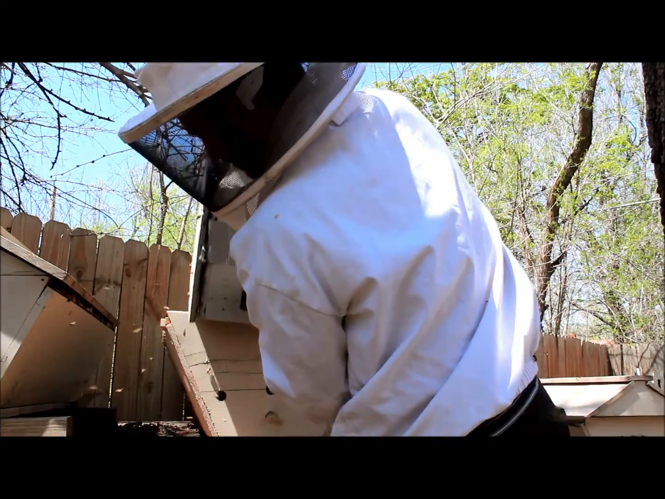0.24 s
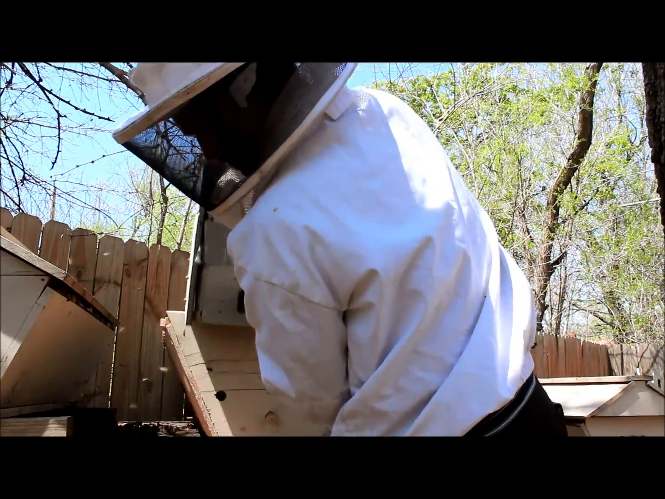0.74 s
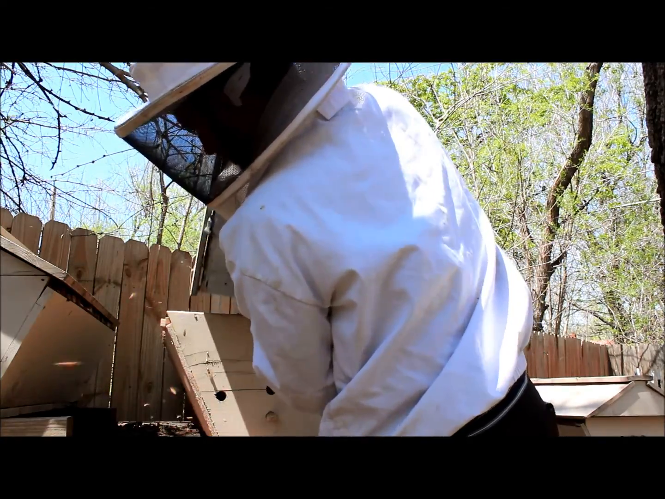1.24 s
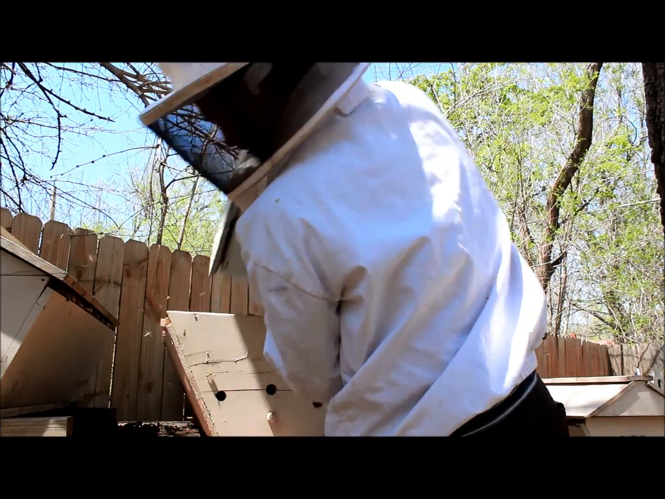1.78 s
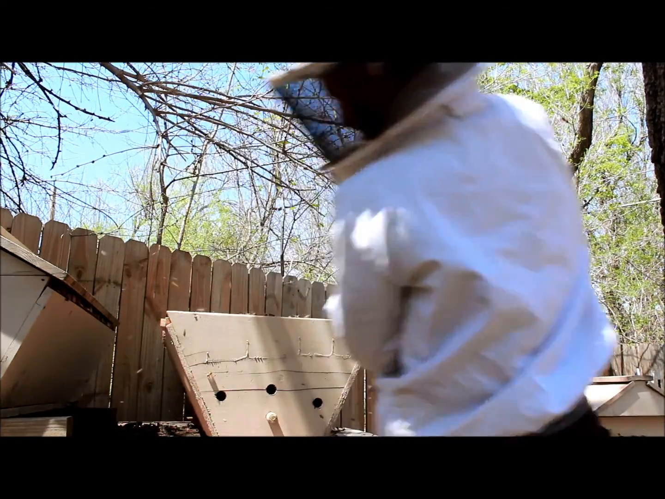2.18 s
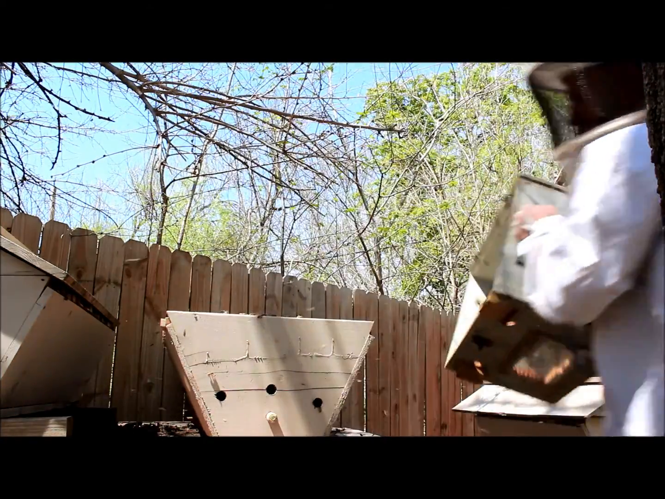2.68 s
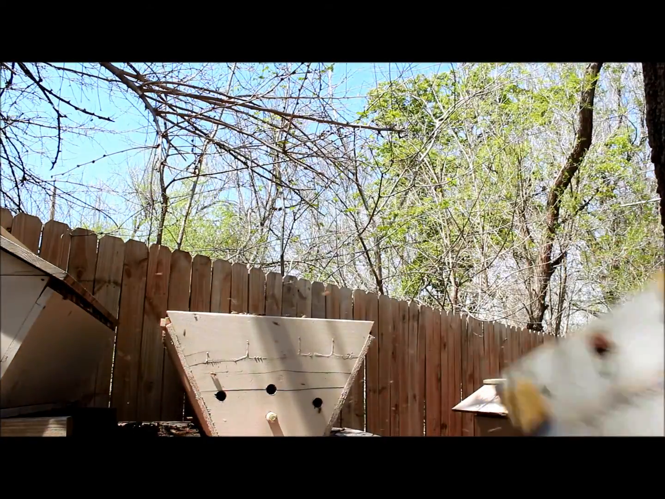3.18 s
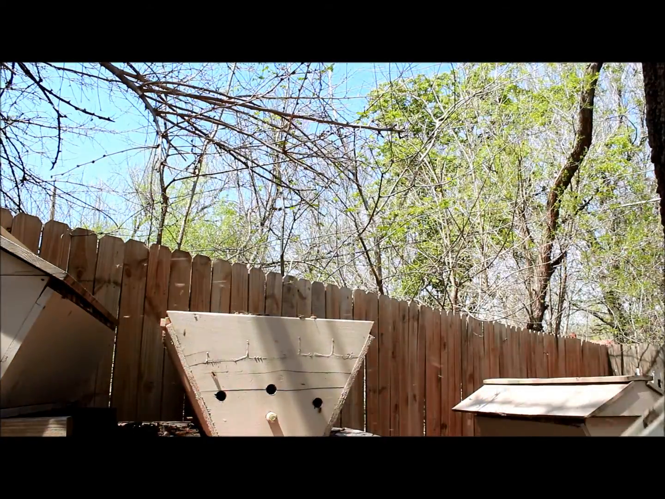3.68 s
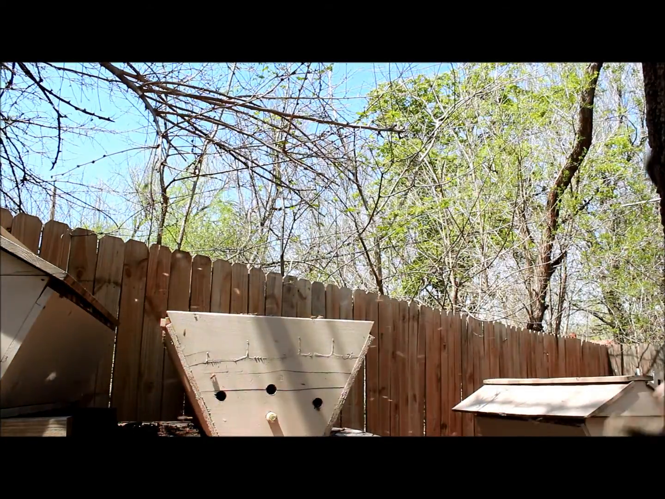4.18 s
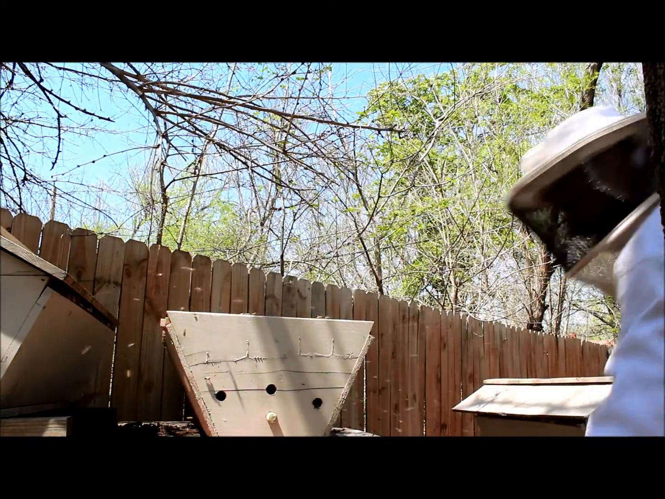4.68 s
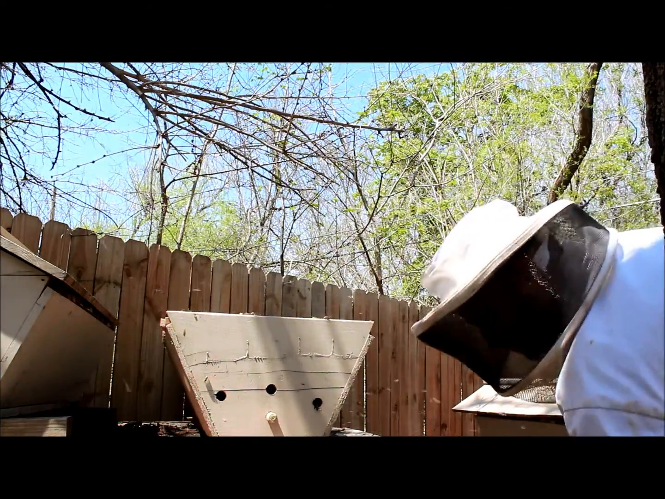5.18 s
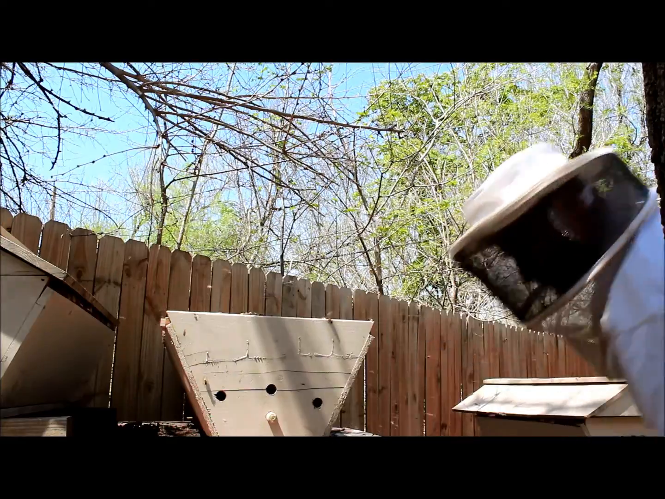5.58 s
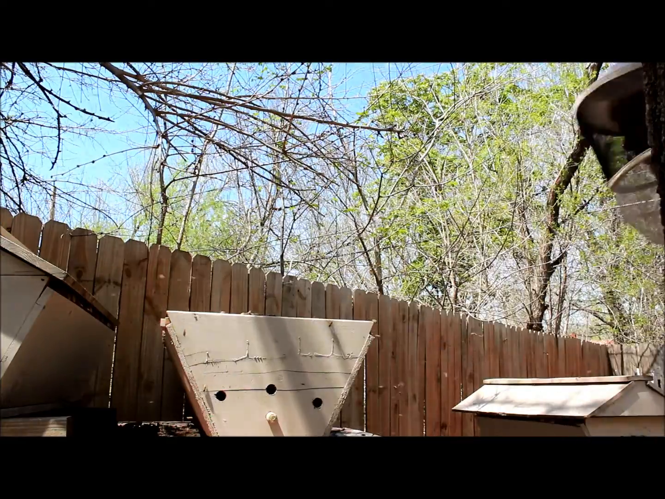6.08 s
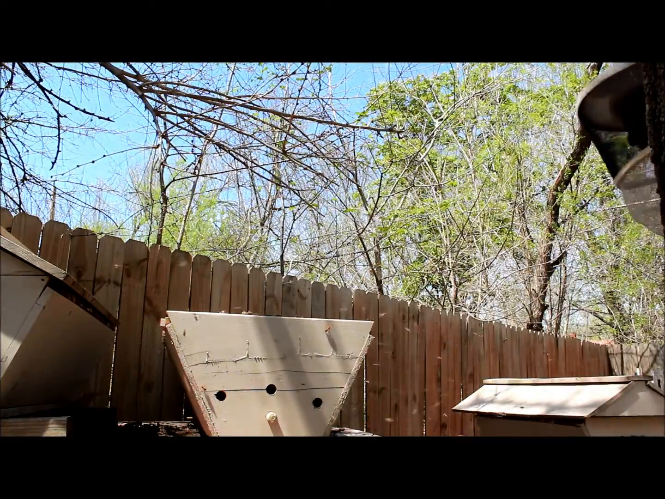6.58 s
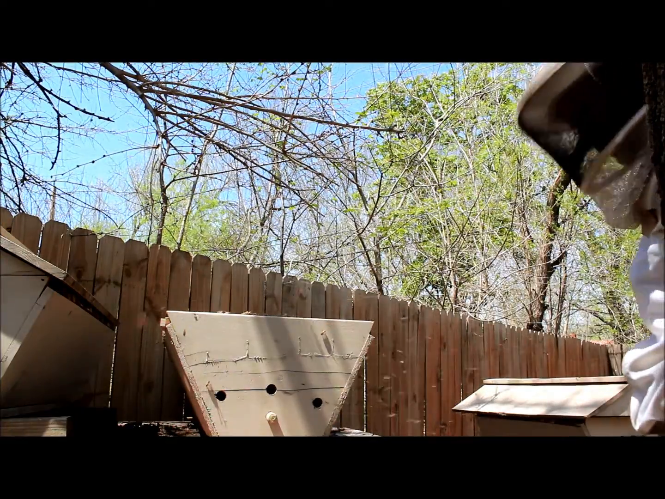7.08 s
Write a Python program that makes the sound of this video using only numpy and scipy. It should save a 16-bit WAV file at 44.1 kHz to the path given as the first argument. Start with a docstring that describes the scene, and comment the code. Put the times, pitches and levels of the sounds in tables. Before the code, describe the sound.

Outdoors beside beehives, a keeper handles a hollow wooden box close to the microphone. Heavy boomy thumps with rattling slats arrive in three early bursts, then only the low wavering buzz of many bees. Softer bumps, short scrapes and squeaks follow mid-way, then bright hard clacks late on. The loudest hits clip and briefly push down the bees; a short dry yard scatter follows each.

```python
"""A bee swarm drones, and at once a wooden box is knocked on a hive in a fenced yard.
A keeper turns the box over and sets it down: ringing modes make the thumps, coloured noise the
clacks and scrapes, wavering overtones the squeaks. Fence, hive and ground scatter them all.
The swarm is many wandering wing beats over noisy air; two low tones mix a far motor with box ring.
The loudest blows overload the microphone and its gain control ducks the swarm."""
import sys
import numpy as np
from scipy import signal
from scipy.io import wavfile
from scipy.ndimage import uniform_filter1d, minimum_filter1d, map_coordinates

SR = 44100
rng = np.random.default_rng(int(sys.argv[2]) if len(sys.argv) > 2 else 0)


def persist_wave(psi):
    """Save psi, clipped to +-1, as 16-bit WAV."""
    counts = np.round(np.clip(psi, -1, 1) * 32767).astype(np.int16)
    wavfile.write(sys.argv[1], SR, np.atleast_2d(counts).T)


N = 323694  # samples


def amp(db):
    """Turns dB into gain."""
    return 10 ** (np.asarray(db) / 20)


def evened(x):
    """Scales a sound to rms 1."""
    return x / np.sqrt(np.mean(x ** 2) + 1e-20)


def read(points, hz):
    """Reads a table over frequency, straight between points on a log axis."""
    f, value = np.transpose(points)
    return np.interp(np.log(hz + 1), np.log(f + 1), value)


def add(mix, start, sound):
    """Mixes a sound in at start seconds, cut at the end of the mix."""
    part = mix[round(start * SR):][:len(sound)]
    part += sound[:len(part)]


def drift(hz, count, length, rate):
    """Slow chance: count rows of random values, hz new ones a second, joined by straight lines."""
    knots = rng.standard_normal((count, 400))
    at = np.arange(length) / rate * hz
    return map_coordinates(knots, np.meshgrid(np.arange(count), at, indexing="ij"), order=1)


# Blows on the hollow box. Each row: start in seconds, peak level in dB, focus in Hz,
# fall away from the focus in dB per octave.
BLOWS = [(0.084, -4, 207, 6), (0.095, -13, 355, 12), (0.106, -8.5, 196, 7.5), (0.826, -0.5, 294, 3.5),
         (0.834, 2, 218, 5), (0.849, -16, 300, -5), (0.925, -20.5, 240, 3), (0.97, -21.5, 208, 8),
         (1.508, 6, 214, 4), (1.527, 2, 425, 8), (1.597, -15.5, 240, 2), (2.93, -25.5, 237, 9),
         (2.96, -28, 221, 7), (3.108, -15, 258, 17), (3.129, -19.5, 314, 16), (3.181, -25, 221, 25),
         (3.304, -16, 340, 38), (3.316, -8.5, 238, 32), (3.349, -23, 221, 0), (4.06, -24, 237, 18),
         (4.776, -32, 214, 8), (5.053, -9, 196, 9), (5.161, -10.5, 300, 15), (5.302, -18.5, 232, 5),
         (5.372, -17, 267, 28), (5.422, -21, 295, 12), (5.73, -20, 290, 21)]
# Modes of the box. Each row: frequency in Hz, relative level in dB,
# t60 in seconds before the force of the blow scales it.
BOX_MODES = [(135.4, -7.5, 0.14), (204.8, 1, 0.12), (238.5, 3.5, 0.044), (293, -5.5, 0.14), (345, -7, 0.12),
             (433.5, -5.5, 0.061), (483.6, -3.5, 0.086), (546, -17, 0.14), (593, -17, 0.11),
             (718, 0, 0.018), (858, -5, 0.048)]
# Ring time factor of a 0 dB blow; softer blows, the box held looser, ring longer.
BOX_RING, CHOKE_PER_DB = 0.7, 0.0737


def thump(db, focus_hz, narrow_db):
    """A blow sets the box modes ringing; its place favours those near the focus."""
    t = np.arange(SR // 4) / SR
    ring = BOX_RING - CHOKE_PER_DB * db
    hz, level_db, t60 = np.transpose(BOX_MODES)[:, :, None]
    sign = (-1) ** np.arange(len(BOX_MODES))[:, None]
    gain = sign * amp(level_db - narrow_db * abs(np.log2(hz / focus_hz)))
    decay = np.log(1000) / (t60 * ring)
    modes = gain * np.exp((2j * np.pi * hz - decay) * t)
    sound = modes.imag.sum(0) * np.minimum(t / 0.0012, 1)  # rises in 1.2 ms
    return amp(db) * sound / abs(sound).max()


# Dense modes of slats and mesh. Each row: frequency in Hz, relative level in dB per Hz.
SLAT_SPECTRUM = [(250, -53), (500, -1.5), (850, 2.9), (1300, -0.5), (1900, -2), (2250, -4.5), (2750, -7),
                 (3300, -9), (4100, -11), (6200, -24), (10000, -39.5), (16000, -48)]


def rattled(slips, tilt_db, rings=()):
    """Dense slat modes colour grainy noise; tilt_db gives the dB per octave at any moment."""
    hz, t, z = signal.stft(slips, SR, nperseg=256, noverlap=224)
    body_db = read(SLAT_SPECTRUM, hz)
    for ring_hz, lift_db in rings:
        octaves = np.log2(hz / ring_hz + 1e-9)
        body_db = body_db + lift_db * np.exp(-(octaves / 0.33) ** 2)
    octaves_up = np.log2(hz[:, None] / 1500 + 0.18)
    colour = amp(body_db[:, None] + octaves_up * tilt_db(t))
    z = z * colour / np.sqrt((colour ** 2).mean(0))  # the tilt leaves the level alone
    return evened(signal.istft(z, SR, nperseg=256, noverlap=224)[1][:len(slips)])


# Sharp taps that set slats and mesh rattling. Each row: start in seconds, peak level in dB,
# ring in Hz, starting tilt in dB per octave, t60 in seconds.
TAPS = [(0.077, -19, 2850, -8, 0.19), (0.085, -24, 2510, 10.5, 0.089), (0.106, -23, 766, 0.5, 0.14),
        (0.827, -16, 1670, 8.5, 0.077), (0.835, -0.5, 720, -3.5, 0.07), (0.849, -8.5, 1770, -12, 0.12),
        (0.935, -24, 3000, -5, 0.047), (1.508, -15, 783, 13, 0.031), (1.514, -7.5, 1060, -1.5, 0.14),
        (1.529, -8, 7100, 19.5, 0.015), (1.557, -21, 2400, -1.5, 0.11), (1.77, -37, 3500, 6, 0.025),
        (2.595, -28, 1880, 11.5, 0.063), (2.926, -23, 756, 1, 0.059), (3.065, -20, 829, 2.5, 0.056),
        (3.098, -13.5, 1020, 4.5, 0.079), (3.108, -12.5, 1520, 4, 0.047), (3.302, -18, 1730, -5.5, 0.1),
        (4.16, -14, 2740, 2, 0.04), (5.031, -27, 2500, -2, 0.045), (5.067, -14, 1500, 6, 0.043),
        (5.086, -7.5, 2000, 2.5, 0.057), (5.096, -5, 1340, 1.5, 0.035), (5.162, 8, 1040, 0, 0.027),
        (5.171, -3, 1950, 3, 0.048), (5.298, -5.5, 790, -7.5, 0.028), (5.458, -19, 790, 2.5, 0.05),
        (5.674, -30, 6500, 8, 0.035), (5.721, -8.5, 2830, -3.5, 0.056), (5.722, 2.7, 895, -10.5, 0.036)]
RING_LIFT_DB, CLACK_RISE_S = 10, 0.0014
CREST_DB = 8  # a rattle's peaks stand this far over its mean level


def clack(db, ring_hz, tilt_db, t60):
    """A rattle that starts sharply, dies fast and grows duller as it dies."""
    t = np.arange(SR // 10) / SR
    noise = rng.standard_normal(len(t))
    burst = rattled(noise, lambda at: tilt_db - 30 * at, [(ring_hz, RING_LIFT_DB)])
    return amp(db - CREST_DB - 60 * t / t60) * burst * np.minimum(t / CLACK_RISE_S, 1)


# Wood sliding on wood. Each row: time of greatest pressure in seconds, level in dB,
# tilt in dB per octave, build-up in seconds, release in seconds.
SLIDES = [(2.926, -38, 2.5, 0.035, 0.15), (3.118, -29, 2, 0.03, 0.072), (4.066, -33, 2, 0.008, 0.027),
          (4.105, -41, 1, 0.02, 0.011), (4.166, -31.5, 4, 0.093, 0.062), (4.233, -36.5, 0.5, 0.06, 0.066),
          (5.033, -31.5, 12, 0.003, 0.13), (5.099, -22, -1, 0.11, 0.073), (5.385, -32.5, -1.5, 0.03, 0.076),
          (5.425, -29, -7.5, 0.076, 0.053)]
STROKE_DB = 27  # how far the level lies under its top at either end of a stroke


def scrape(peak_s, db, tilt_db, build, release):
    """Dense uneven slips of the wood grain shake the slats; pressure builds, then lets go."""
    t = np.arange(-build, release, 1 / SR)
    slips = rng.standard_normal(SR // 4) * amp(4.5 * rng.standard_normal(SR // 4))
    sound = rattled(slips, lambda at: np.full_like(at, tilt_db))[:len(t)]
    t = t[:len(sound)]
    stroke_db = -STROKE_DB * np.where(t < 0, -t / build, t / release)
    return peak_s - build, sound * amp(db + stroke_db) * signal.windows.tukey(len(t), .15)


# Stick-slip squeaks. Each row: start in seconds, length in seconds, pitch in Hz, starting level
# in dB, loudest frequency in Hz, fall away from it in dB per octave, roughness as a pitch factor.
STICK_SLIPS = [(3.032, 0.027, 3170, -28.5, 3150, 20, 0.084), (3.107, 0.011, 3080, -27.5, 3150, 28, 0.25),
               (4.059, 0.062, 685, -31, 2040, 8, 0.28), (4.065, .012, 4080, -43, 4080, 28, .15),
               (4.126, 0.041, 1207, -25, 3000, 4.5, 0.19), (4.154, 0.032, 2926, -27.5, 2900, 14, 0.7)]


def squeak(start, length, hz, db, loud_hz, fall_db, rough):
    """A wavering slip rate with its lower overtones, fading as the parts come free."""
    t = np.arange(0, length, 1 / SR)
    noise = rng.standard_normal((2, 4000))
    waver = uniform_filter1d(noise, size=50, axis=1)[:, 100:100 + len(t)]
    waver -= waver.mean(1, keepdims=True)
    turns = np.cumsum(hz * (1 + rough * waver[0])) / SR
    tone = np.zeros(len(t))
    for k in range(1, 8):
        if k * hz < max(5500, 2.1 * hz):
            gain = amp(-fall_db * abs(np.log2(k * hz / loud_hz)))
            tone += gain * np.sin(2 * np.pi * k * turns)
    level = amp(db + 22 * waver[1] - 310 * t)  # flutters, and falls 310 dB a second
    return start, evened(tone) * level * signal.windows.tukey(len(t), .25)


def handled_box():
    """All the blows, rattles, scrapes and squeaks of the wood, without the yard."""
    wood = np.zeros(N)
    for start, *row in BLOWS:
        add(wood, start, thump(*row))
    for start, *row in TAPS:
        add(wood, start, clack(*row))
    for row in SLIDES:
        add(wood, *scrape(*row))
    for row in STICK_SLIPS:
        add(wood, *squeak(*row))
    # the microphone picks up little of the wood's deepest bass
    return signal.lfilter(*signal.butter(2, 105, "high", fs=SR), wood)


# Scattered sound of the yard. Each row: frequency in Hz, t60 in seconds.
YARD_DECAY = [(150, 0.22), (500, 0.16), (2000, 0.072), (8000, 0.082)]


def yard(x):
    """Fence, hive and ground scatter the wood's sound; each band dies at its own speed."""
    taps = np.zeros(SR // 2)
    at = np.arange(100, len(taps) - 20, 20)
    taps[at + rng.integers(0, 20, len(at))] = rng.choice([-1., 1.], len(at))
    hz, t, z = signal.stft(taps, SR, nperseg=256)
    decay_db = -60 * t / read(YARD_DECAY, hz)[:, None]
    tail = signal.istft(z * amp(decay_db), SR, nperseg=256)[1]
    x = signal.lfilter(*signal.butter(1, 600, "high", fs=SR), x)  # the yard's scatter is thin in bass
    return signal.fftconvolve(x, tail / np.linalg.norm(tail))[:N]


# Overtones of a wing beat. Each row: multiple of the beat, relative level in dB.
WING_OVERTONES = [(1, -2), (2, 2.5), (3, -4.5), (4, -4), (5, -3.5), (6, -7.5), (8, -14.5), (14, -26)]
WING_HZ, WING_SPREAD = 238.2, .09  # middle beat rate, and the bees' spread as a fraction of it


def bees(count=32):
    """Each bee beats its wings at its own wandering rate and flies nearer or farther."""
    n, rate = N // 4 + 1, SR / 4  # wing tones stay low, so a quarter of the rate is enough
    own, start = rng.standard_normal((count, 1)), rng.random((count, 1))
    wander = .035 * drift(5, count=count, length=n, rate=rate)
    hz = WING_HZ * (1 + WING_SPREAD * own + wander)
    beat = np.exp(2j * np.pi * (np.cumsum(hz, axis=1) / rate + start))
    partial = amp(3 * drift(3, count=count, length=n, rate=rate))  # nearness
    multiple, db = np.transpose(WING_OVERTONES)
    tone = np.zeros(n)
    for k in range(1, 15):
        partial = partial * beat  # steps up to the next multiple of the wing beat
        tone += amp(np.interp(k, multiple, db)) * partial.imag.sum(0)
    return evened(signal.resample_poly(tone, 4, 1)[:N])


# Air around the microphone. Each row: frequency in Hz, relative level in dB per Hz.
AIR_SPECTRUM = [(20, -37), (45, -22), (75, -12), (125, -4.5), (170, -11.5), (290, -12.5), (600, -22),
                (1260, -22.5), (2500, -27), (5000, -34.5), (9000, -40.5), (16000, -43)]


def air():
    """Far bees, traffic and microphone hiss: random short-time spectra with faint patches."""
    frames, hz = N // 256 + 5, np.fft.rfftfreq(1024, 1 / SR)
    a, b, patches = rng.standard_normal((frames, 513, 3)).T
    patches = uniform_filter1d(patches, 10, 0)  # over frequency
    patches = evened(uniform_filter1d(patches, 14, 1))  # over time
    z = (a + 1j * b) * amp(read(AIR_SPECTRUM, hz)[:, None] + 0.9 * patches)
    return evened(signal.istft(z, nperseg=1024, noverlap=768)[1][:N])


# Level of bees and air before each one's trim. Each row: time in seconds, level in dB.
BACKGROUND_LEVEL = [(0.0, -41), (1.5, -42), (2.8, -41), (3.2, -39), (3.6, -41.5), (4.9, -40.5), (5.15, -38),
                    (5.9, -41), (7.34, -41)]
AIR_DB, BEES_DB = 1.0, -0.5  # trims


def swarm():
    """Bees and air share one level, which also carries the loose rustle around the scrapes."""
    s, db = np.transpose(BACKGROUND_LEVEL)
    level = amp(np.interp(np.arange(N) / SR, s, db))
    return level * (amp(AIR_DB) * air() + amp(BEES_DB) * bees(count=32))


# Low tones before their waver. Each row: time in seconds, rms level of the first partial in dB,
# rms level of the second partial in dB.
LOW_TONE_LEVELS = [(0.0, -41, -45), (0.5, -51, -51.5), (0.95, -50.5, -43.5), (1.7, -46.5, -52),
                   (2.06, -55, -44), (2.45, -62, -61.5), (3.3, -45.5, -49.5), (3.85, -46.5, -44.5),
                   (4.3, -46.5, -49), (4.7, -55, -47), (5.4, -39.5, -40), (6.05, -49.5, -49),
                   (6.5, -70, -39), (6.8, -47, -54), (7.34, -41, -45.5)]
LOW_TONE_HZ = 101.8  # middle of the first partial


def low_tones():
    """Two wavering low tones, a far motor's hum mixed with lingering low ring of the box."""
    s, first_db, second_db = np.transpose(LOW_TONE_LEVELS)
    t = np.arange(N) / SR
    wander = 0.02 * drift(9.0, count=1, length=N, rate=SR)[0]
    turns = np.cumsum(LOW_TONE_HZ * (1 + wander)) / SR
    waver_db = 3 * drift(11, count=1, length=N, rate=SR)[0]
    tone = np.zeros(N)
    for k, db in ((1, first_db), (2, second_db)):
        tone += amp(np.interp(t, s, db) + waver_db) * np.sin(2 * np.pi * k * turns)
    return np.sqrt(2) * tone  # a sine's peak over its rms


def scene():
    """The handled box and its scatter in the yard over the swarm and the low tones."""
    wood = handled_box()
    return (wood + amp(-8.0) * yard(wood) + swarm() + low_tones())[None]


EDGE_HZ = 15750  # upper band limit


def record(dry):
    """Gain control ducks after loud blows, the converter clips, then the band limit."""
    power_db = 10 * np.log10(abs(uniform_filter1d(dry[0] ** 2, 800)) + 1e-12)
    power_db = -minimum_filter1d(-power_db, size=2400, origin=1199)  # holds the peak for a moment
    fall = np.arange(N) * 30 / SR  # the held level falls 30 dB a second
    held_db = np.maximum.accumulate(power_db + fall) - fall
    over_db = np.maximum(held_db + 11, 0)  # above a threshold of -11 dB
    late_db = signal.lfilter([1 / 1000], [1, 1 / 1000 - 1], over_db)  # lags by about 1000 samples
    clipped = np.clip(dry / amp(0.63 * late_db), -1, 1)
    kernel = signal.firwin(511, EDGE_HZ, window=("kaiser", 9), fs=SR)
    return np.clip(signal.oaconvolve(clipped, kernel[None], "same"), -1, 1)


dry = scene()
out = record(dry)
persist_wave(out)
```